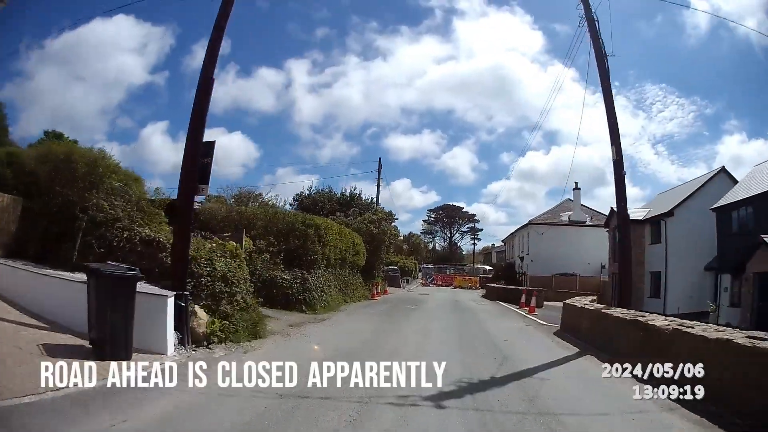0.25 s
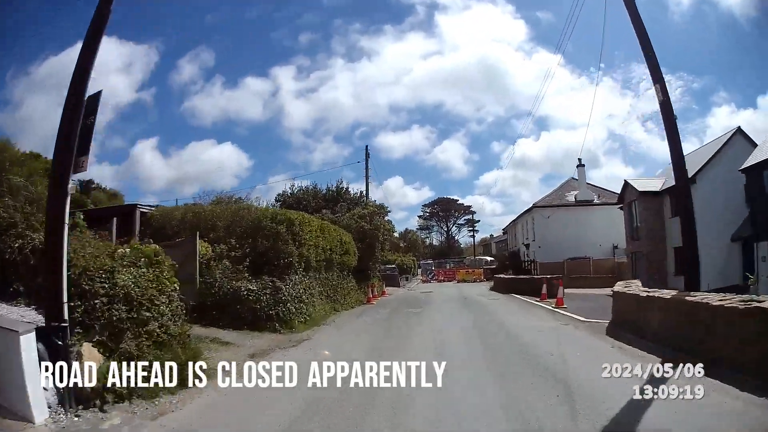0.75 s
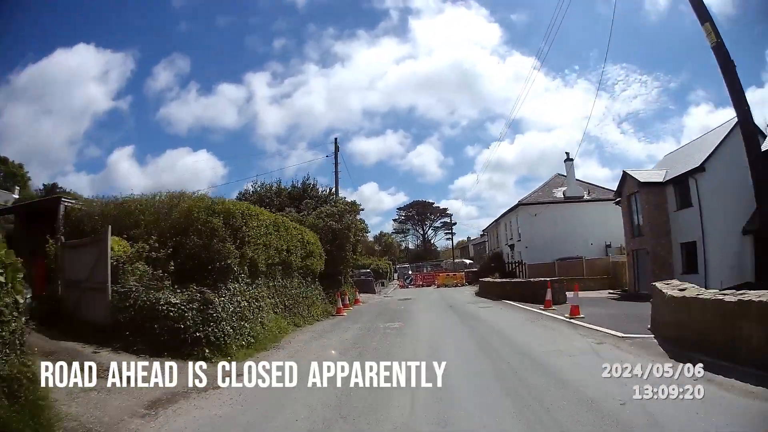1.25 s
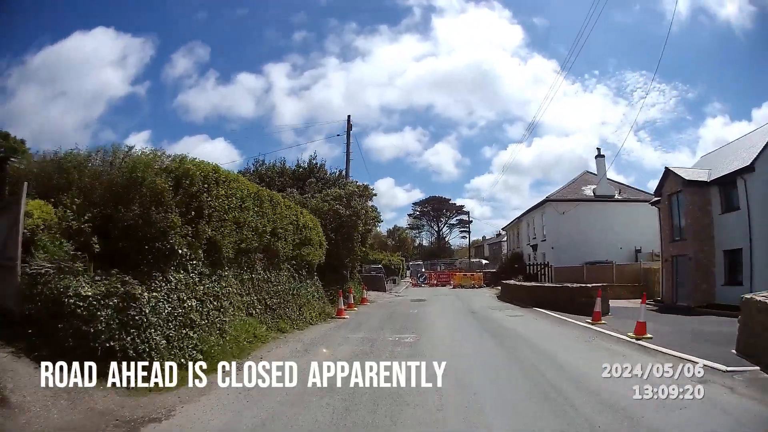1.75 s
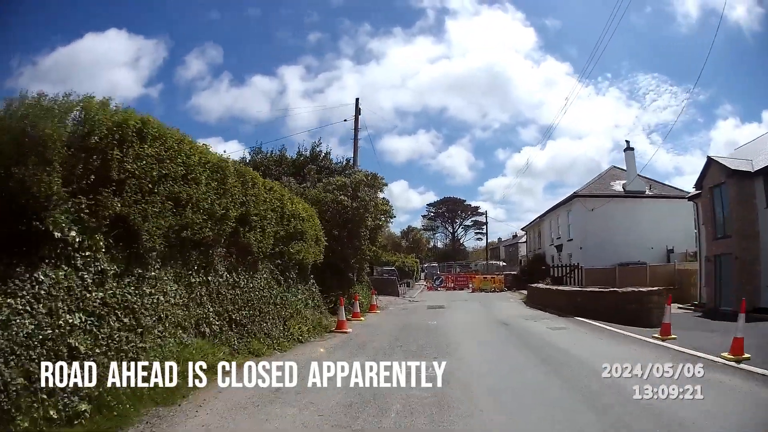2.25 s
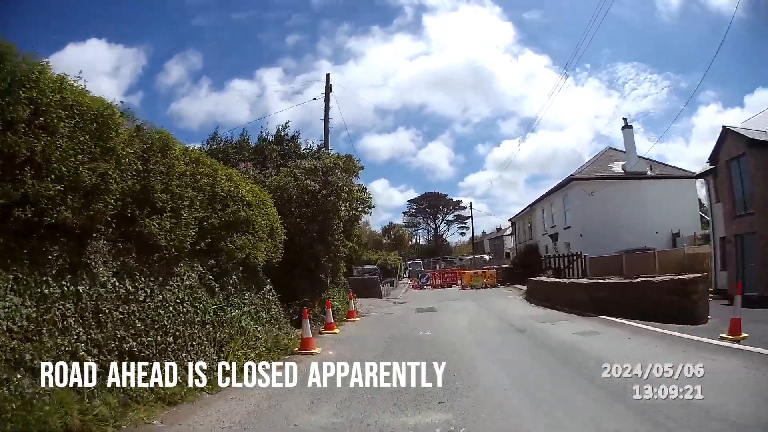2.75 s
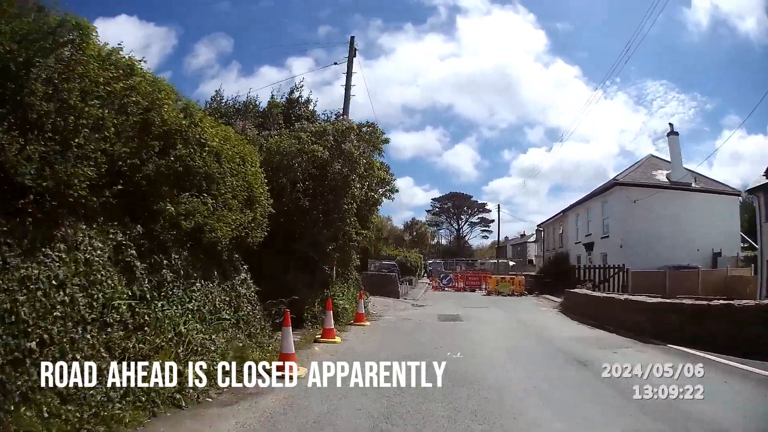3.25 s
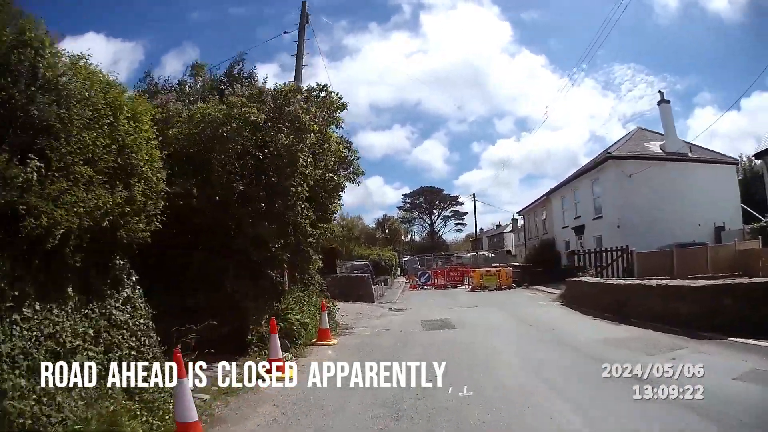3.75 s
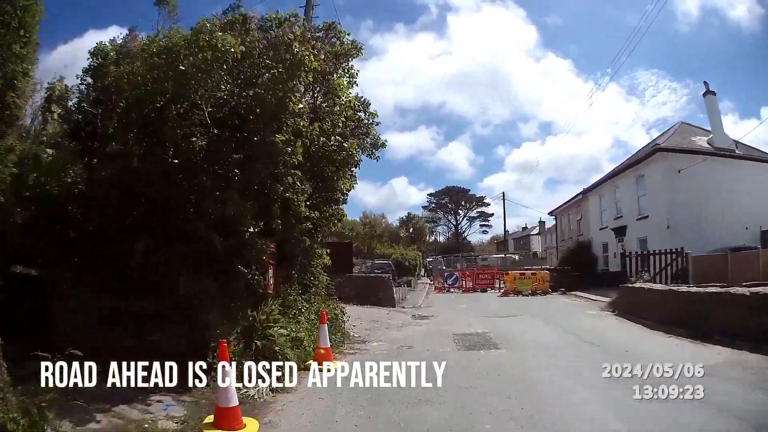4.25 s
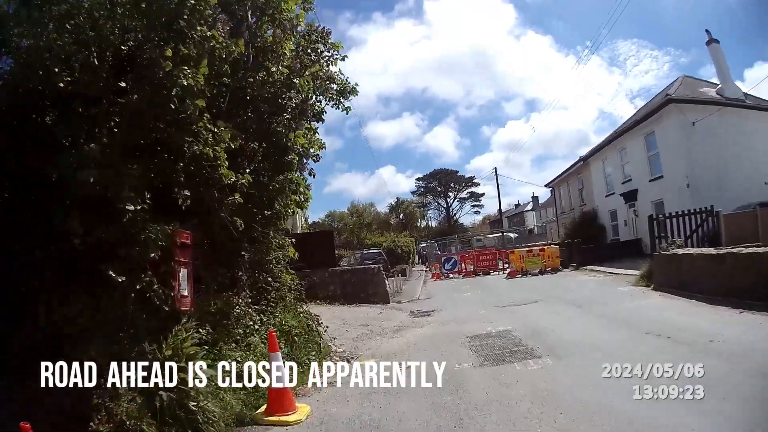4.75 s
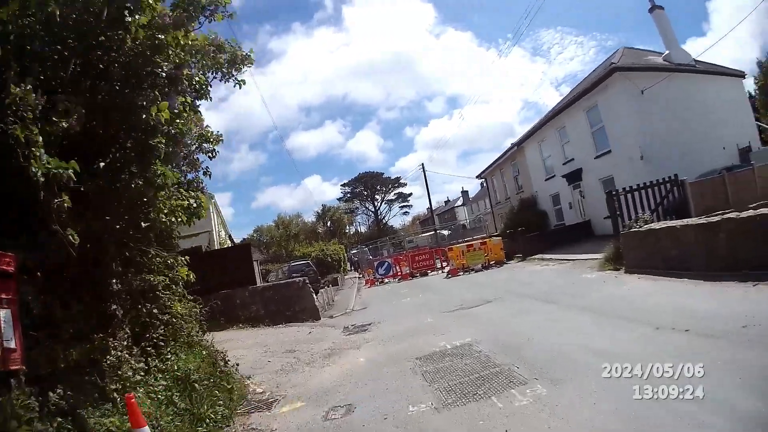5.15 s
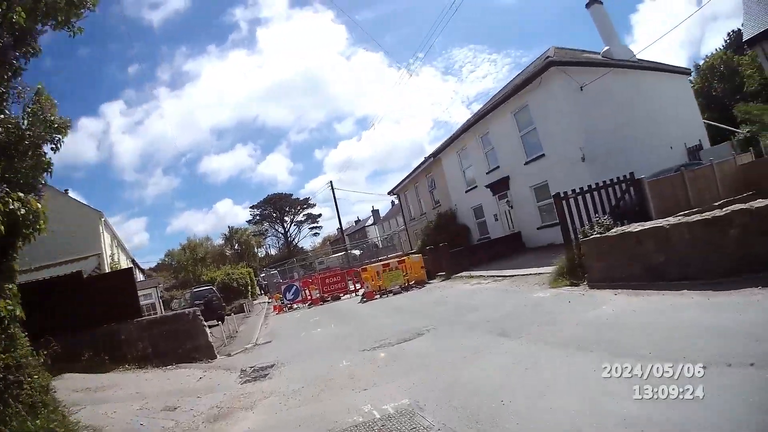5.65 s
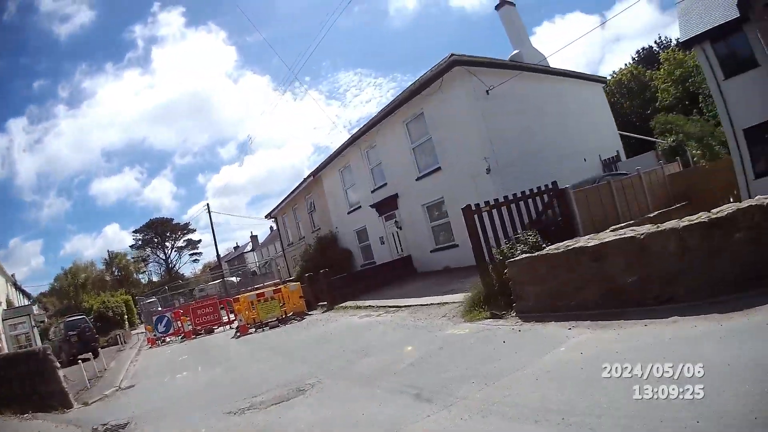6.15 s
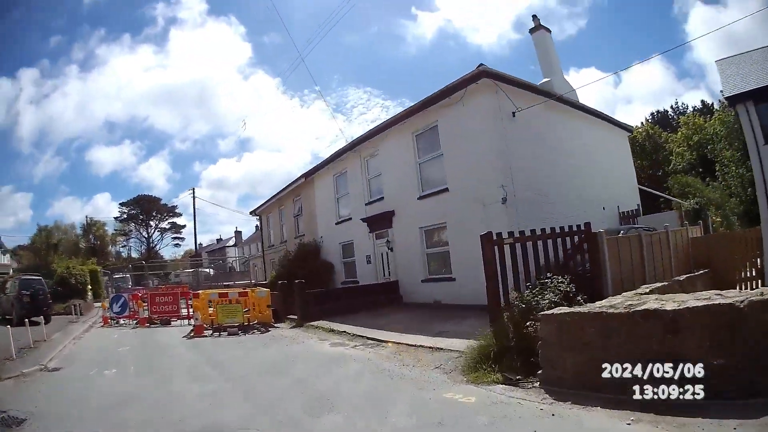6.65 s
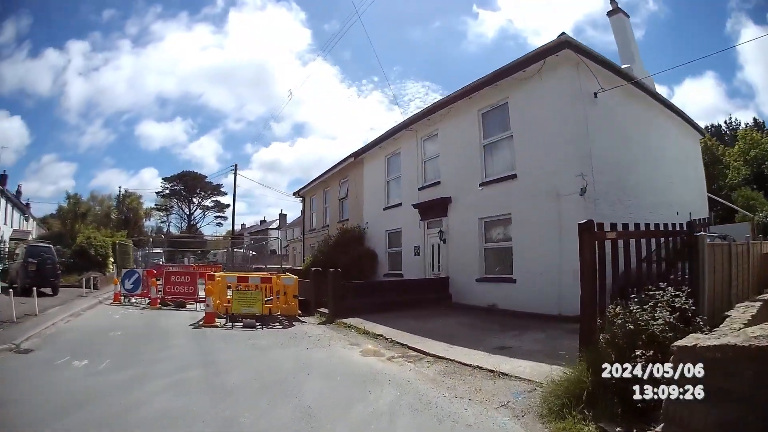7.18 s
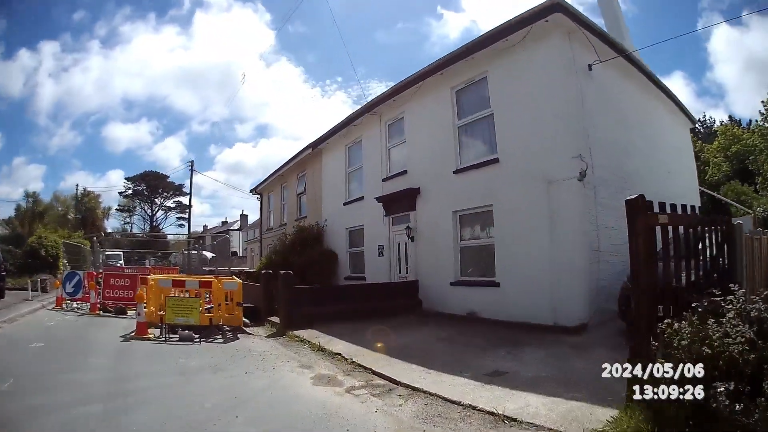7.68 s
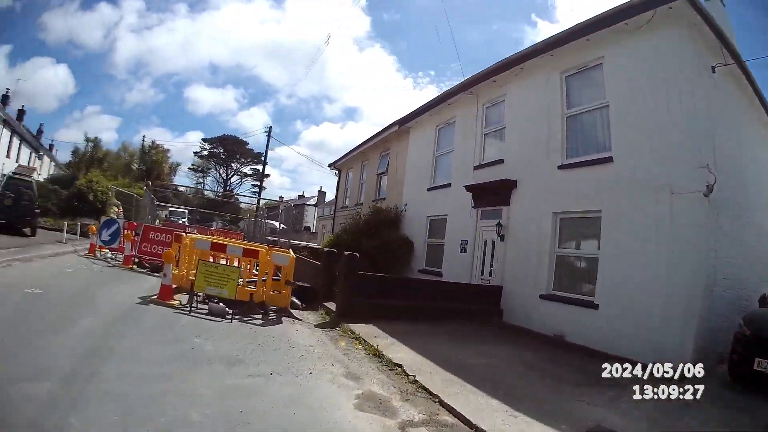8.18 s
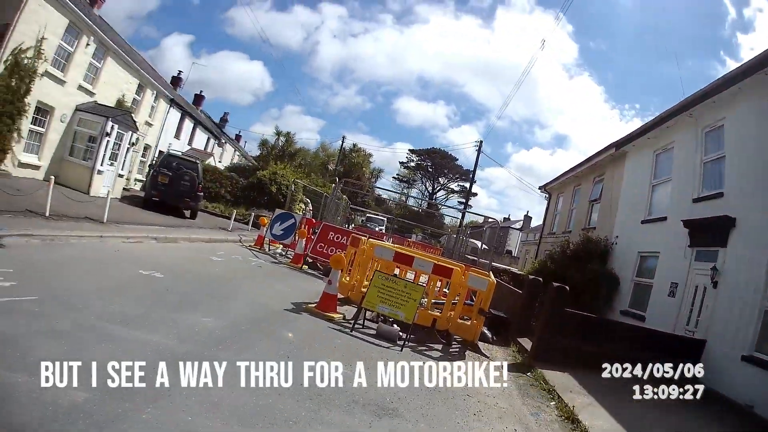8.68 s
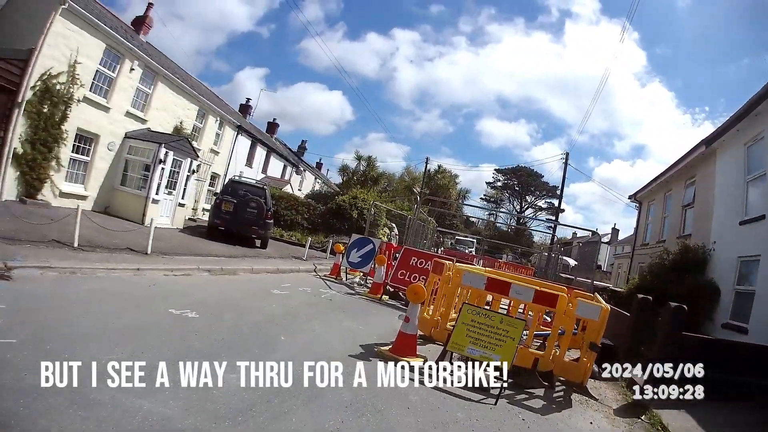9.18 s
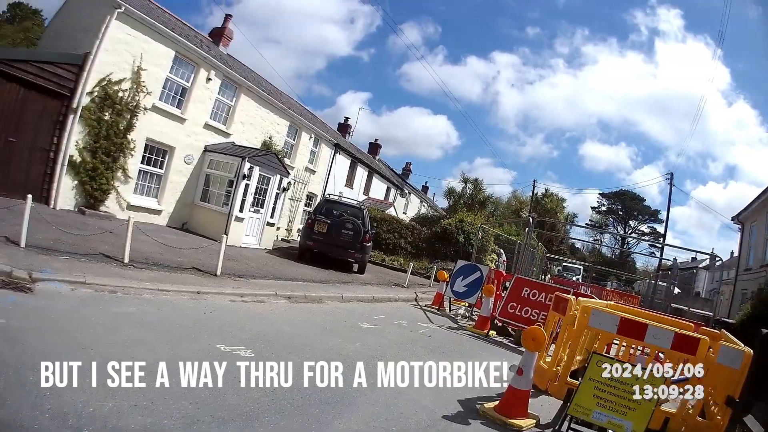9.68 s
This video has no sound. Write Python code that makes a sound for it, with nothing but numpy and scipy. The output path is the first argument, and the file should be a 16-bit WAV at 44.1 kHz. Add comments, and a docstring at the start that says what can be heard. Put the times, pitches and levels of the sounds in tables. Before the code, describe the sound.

A muffled motorcycle engine drones, eases off to idle and coasts slower, with ticking valves, road rumble and a few knocks.

```python
"""A four-cylinder motorcycle on the road, heard close up from a muffled microphone bolted to the bike.
The engine pulls, then drops to idle as the clutch comes in; the bike rolls on and slows, its tyre hum
sinking. The exhaust thumps and drones, while valve ticks and road rumble reach the microphone through
the resonances of frame, fairing and housing, with a few knocks and a squeak over a faint hiss."""
import sys
import numpy as np
from scipy import signal
from scipy.io import wavfile

SR = 44100
rng = np.random.default_rng(int(sys.argv[2]) if len(sys.argv) > 2 else 0)


def unload_wav(signal):
    """Save mono or channel-first audio to the path in sys.argv[1] as 16-bit WAV at rate SR, clipped to [-1, 1]."""
    wavfile.write(
        sys.argv[1],
        SR,
        np.round(np.clip(np.atleast_2d(signal).T, -1, 1) * 32767).astype(np.int16),
    )


N = 437472

# Resonances of the parts around the microphone. Each row: pitch in Hz, width in Hz, relative level in dB.
LOWER_HOUSING_MODES = [(647, 74, -14), (766.4, 81, -14.5)]
LENS_MOUNT_MODES = [(1990, 170, -40.5), (2488, 160, -42), (2710, 260, -54), (3130, 80, -42.5)]
RATTLE_MODES = [(7400, 500, 0), (8770, 700, 0), (9710, 400, -2)]


def exhaust_thumps(cycle, load):
    """Each cylinder gives a suction pulse with a slower rebound and rings the pipe."""
    # Each row: a cylinder's place in the cycle from 0 to 1, relative level in dB.
    cylinders = [(.062, 0), (.285, -7), (.49, -16), (.78, -17)]
    # The idle thumps firm up as the bike slows. Each row: time in seconds, extra level in dB.
    firmness = [(0, 0), (1.7, -2), (2.2, -7), (4, -6), (5, -1), (6.5, 0), (8.5, 0.5), (9.92, 0)]
    pulses = sum(from_db(db) * each_cycle(cycle, place, jitter_s=.00024, spread_db=1.6)
                 for place, db in cylinders)
    suction = bump(pulses, length_s=.0021)
    rebound = signal.sosfiltfilt(signal.butter(1, 120, fs=SR, output="sos"), suction)
    pipe = resonate(pulses, [(238, 35, 0)])
    level_db = by_load(load, idle=-36, pulling=-34.5) + in_time(firmness)
    return from_db(level_db) * (rms_one(rebound - suction) + .45 * rms_one(pipe))


def exhaust_drone(cycle, load):
    """Four firings a cycle make a tone; the other harmonics of the cycle swell under load."""
    # The firing tone. Each row: time in seconds, level in dB.
    firing_levels = [(0, -30), (.2, -30), (.42, -37), (.58, -26), (1.0, -26), (1.12, -41), (1.22, -27),
                     (1.4, -26), (1.6, -32), (1.85, -42), (5, -45), (9.92, -44)]
    # Each row: multiple of the cycle rate, relative level in dB. The fourth is left to the firing tone.
    partials = [(1, -42), (2, -28), (3, -10), (4, 0), (5, -7), (6, -11), (7, -6), (8, -5), (9, -9),
                (10, -8), (11, -9), (12, -12), (13, -11), (14, -24), (15, -26), (16, -28), (17, -22),
                (18, -19), (19, -17), (20, -17)]
    unsteady_cycle = cycle + .005 * drift(8)
    drone = 0
    for k, db in partials:
        if k != 4:
            drone += from_db(db + 2.2 * drift(2.2)) * np.sin(2 * np.pi * (k * unsteady_cycle + rng.random()))
    drone_db = by_load(load, idle=-62.5, pulling=-29.5)
    tone = -np.sqrt(2) * np.cos(2 * np.pi * 4 * (cycle - .015))
    tone_db = in_time(firing_levels) + 2.7 * drift(1.9)
    return from_db(tone_db) * tone + from_db(drone_db) * rms_one(drone)


def valve_clatter(cycle, load, patch_db):
    """Valves and pistons strike the bodywork; a gritty grind that swells with the blows fills the gaps."""
    # Each row: place in the cycle from 0 to 1, then strength in dB into fairing, lower housing,
    # upper housing, bracket and lens mount.
    contacts = [(.04, -16, -12, -9, -2, -8), (.065, -20, -20, -7, -12, -3), (.1, -20, 0, -14, -12, -7),
                (.25, -6.5, -7, -10, -17, -13), (.32, -20, -20, -5, -19, -14),
                (.43, -9, -20, -14, -20, -20), (.475, -1, -14, -14, -10, -14), (.52, -8, 0, -1.5, -9, -10),
                (.56, -14, -20, -14, -20, -6), (.6, -20, -12, -11, -20, -13),
                (.7, -8.5, -14, -14, -20, -16), (.9, -6, -14, -11, -16, -16), (.955, -20, -3, -9, -8, -11),
                (.998, -2, -9, -12, -16, -16)]
    # Body resonances. Each row: pitch in Hz, width in Hz, relative level in dB.
    fairing = [(339.3, 74, -7), (408.4, 79.1, 3), (454.8, 72.8, -0.5), (503.9, 56.4, -6.5)]
    upper_housing = [(1051, 163, -21.5), (1249, 87, -22.5), (1414, 174, -25)]
    bracket = [(1532, 100, -22.5), (1697, 99.5, -18.5)]
    # Harder strokes on the bracket. Each row: start in seconds, peak in dB.
    hard_strokes = [(2.9175, -46), (3.0784, -48), (3.7257, -45), (3.8865, -46), (4.1303, -47), (4.69, -47),
                    (5.191, -46), (5.358, -45), (5.8536, -42), (5.9344, -44), (6.015, -45), (6.2549, -46),
                    (6.4985, -46), (7.5473, -47), (7.872, -47), (8.1167, -48)]
    # Each row: resonances, weight of the blows, power that makes the grind grittier.
    bodies = [(fairing, .92, 1), (LOWER_HOUSING_MODES, .66, 1), (upper_housing, .5, 1),
              (bracket, .9, 1), (LENS_MOUNT_MODES, .74, 3)]
    blows = [each_cycle(cycle, row[0], jitter_s=.0003, spread_db=1.4) for row in contacts]
    # Single blows stand out at idle and blur at speed.
    distinct = np.clip(by_load(load, idle=.87, pulling=.4) + .07 * drift(.8), 0, 1.1)
    ringing = 0
    for column, (modes, weight, grit) in enumerate(bodies, 1):
        hits = sum(from_db(row[column]) * blow for row, blow in zip(contacts, blows))
        swell = 1 + .35 * distinct * rms_one(bump(hits, length_s=.008))
        grind = swell * rng.standard_normal(N) ** grit
        share = weight * distinct
        force = share * rms_one(hits) + np.sqrt(1 - share ** 2) * rms_one(grind)
        ringing += resonate(force, modes)
    level_db = by_load(load, idle=-42.5, pulling=-37.5) + patch_db
    return from_db(level_db) * rms_one(ringing) + sum(struck(bracket, s, db) for s, db in hard_strokes)


def tyres(patch_db):
    """The road rumbles in the frame and the tread hums; the rumble fades and the hum sinks with speed."""
    # Frame resonances. Each row: pitch in Hz, width in Hz, relative level in dB.
    frame = [(28, 8.6, -21), (62.5, 34, -9), (91.7, 28.7, -1.5), (118, 41, -13), (162.5, 30.4, 0),
             (211.8, 24.7, 1.5), (243.4, 34.7, -6.5)]
    # The slowing wheel. Each row: time in seconds, pitch of the hum in Hz.
    tread_pitch = [(0, 112.4), (1.4, 102.5), (3.6, 91.6), (4.3, 89.25), (5.2, 77), (6.3, 64.5), (7.3, 60.6),
                   (7.8, 55.8), (9.92, 47.2)]
    # How strongly the frame carries the hum. Each row: pitch in Hz, level in dB.
    hum_response = [(45, -44), (53, -54), (62, -37.5), (65, -57), (73, -55), (80, -32.5), (85, -37),
                    (91.5, -29), (97, -31), (102, -38), (110, -33), (114, -22)]
    # Brief dips of the hum. Each row: centre in seconds, half length in seconds, change in dB.
    hum_dips = [(1.13, 0.067, -8), (1.99, 0.033, -16), (2.15, .05, -4), (2.52, 0.025, -12),
                (2.64, 0.073, -14), (3.06, 0.072, -14.5), (3.82, 0.068, -4), (4.03, 0.057, -9.5),
                (4.25, 0.049, -14), (4.7, .1, -8), (5.06, 0.12, -12)]
    hz, db_per_octave = in_time(tread_pitch), 8.5
    roughness = rng.standard_normal(N) * from_db(1.1 * drift(8.1))
    rumble = rms_one(resonate(roughness, frame))
    rumble_db = -29.5 + db_per_octave * np.log2(hz / 90) + patch_db
    hum_db = np.interp(hz, *np.transpose(hum_response)) + 1.4 * drift(6) + swells(hum_dips)[0]
    phase = 2 * np.pi * np.cumsum(hz) / SR + .3 * drift(4)
    return from_db(rumble_db) * rumble + np.sqrt(2) * from_db(hum_db) * np.sin(phase)


def knocks():
    """Road jolts thud, gearbox and frame clunks crack and ring the housing, and a few sharp clicks
    sound, the loudest on the crests of the low thuds."""
    # Each row: start in seconds, peak in dB, ring in Hz.
    jolts = [(1.2165, -15, 215), (1.3097, -17, 165), (4.3137, -19, 195), (7.72, -36, 36)]
    # Each row: start in seconds, peak in dB, upper edge in Hz, lower housing and lens mount rings in dB.
    clunks = [(1.2556, -28, 1300, -36, -60), (1.2674, -33, 1800, -33, -54)]
    # Each row: time in seconds, peak in dB before the top is softened.
    sharp_clicks = [(.6327, -33), (1.3145, -32), (4.3231, -31.5), (6.3293, -45), (7.6975, -45)]
    t = np.arange(SR // 5) / SR
    clunk_decay_s, click_decay_s = .0015, .00016
    out = struck(RATTLE_MODES, s=4.8845, db=-61)   # one faint tink
    for s, db, hz in jolts:
        swell = t * hz * np.exp(1 - t * hz)
        out[round(s * SR):][:len(t)] -= from_db(db) * np.sin(2 * np.pi * hz * t) * swell
    for s, db, top_hz, housing_db, mount_db in clunks:
        dull = signal.butter(2, [400, top_hz], "band", fs=SR, output="sos")
        burst = (rng.standard_normal(len(t)) - 1) * np.exp(-t / clunk_decay_s)
        crack = signal.sosfilt(np.vstack([dull, dull]), burst)
        out[round(s * SR):][:len(t)] += from_db(db) * crack / np.abs(crack).max()
        out += struck(LOWER_HOUSING_MODES, s, housing_db) + struck(LENS_MOUNT_MODES[1:], s, mount_db)
    spike = np.exp(-np.abs(t - .01) / click_decay_s)
    click = signal.sosfilt(signal.butter(1, 9000, fs=SR, output="sos"), spike)
    for s, db in sharp_clicks:
        out[round((s - .01) * SR):][:len(t)] += from_db(db) * click
    return out


def squeak(start_s, length_s, hz, db):
    """A short, slightly wavering tone with soft ends."""
    t = np.arange(N) / SR
    fade = np.clip(np.minimum(t - start_s, start_s + length_s - t) / .012, 0, 1)
    level = np.sqrt(2) * from_db(db + 2.5 * drift(40)) * fade
    return level * np.sin(2 * np.pi * hz * t + 1.1 * drift(25))


def rattle(load, patch_db):
    """Thin noise in narrow high resonances, louder when the engine pulls."""
    level_db = by_load(load, idle=-100, pulling=-80.5) + patch_db
    return from_db(level_db) * rms_one(resonate(rng.standard_normal(N), RATTLE_MODES))


def resonate(x, modes):
    """Parallel resonances, each passed twice so that the valleys between them stay dark."""
    out = 0
    for k, (hz, width_hz, db) in enumerate(modes):
        r = np.exp(-1.5 * np.pi * width_hz / SR)
        b = (1 - r * r) / 2 * np.array([1, 0, -1])
        a = [1, -2 * r * np.cos(2 * np.pi * hz / SR), r * r]
        out += (-1) ** k * from_db(db) * signal.lfilter(b, a, signal.lfilter(b, a, x + 1e-18))
    return out


def struck(modes, s, db):
    """One sharp blow on a body at s seconds, ringing up to the given peak."""
    ring = resonate(signal.unit_impulse(SR // 10), modes)
    out = np.zeros(N)
    out[round(s * SR):][:len(ring)] = from_db(db) * ring / np.abs(ring).max()
    return out


def each_cycle(cycle, place, jitter_s, spread_db):
    """One click a cycle at the given place, with its own small timing error and strength."""
    turns = np.arange(int(cycle[-1]))
    timing, strength = rng.standard_normal((len(turns), 2)).T
    at = np.interp(turns + place, cycle, np.arange(N)) + jitter_s * SR * timing
    clicks = np.zeros(N)
    clicks[np.clip(at.astype(int), 0, N - 1)] = from_db(spread_db * strength)
    return clicks


def bump(clicks, length_s):
    """Spreads each click into a smooth hump centred on it."""
    return signal.fftconvolve(clicks, signal.windows.gaussian(SR // 20, length_s * SR / 2), "same")


def drift(hz):
    """Slow random wander of spread 1: noise at every 40th sample, low-passed twice at hz."""
    r = np.exp(-80 * np.pi * hz / SR)
    slow = signal.lfilter([1], [1, -2 * r, r * r], rng.standard_normal(N // 40 + 2002))[2000:]
    return np.interp(np.arange(N) / 40, np.arange(len(slow)), rms_one(slow))


def swells(rows):
    """Each row swells and fades smoothly around its centre; one curve for each dB column."""
    t = np.arange(N) / SR
    return sum(np.outer(dbs, np.cos(np.pi / 2 * np.clip((t - s) / half_s, -1, 1)) ** 2)
               for s, half_s, *dbs in rows)


def by_load(load, idle, pulling):
    return idle + (pulling - idle) * load


def in_time(rows):
    return np.interp(np.arange(N) / SR, *np.transpose(rows))


def from_db(db):
    return 10 ** (np.asarray(db) / 20)


def rms_one(x):
    return x / np.sqrt(np.mean(x ** 2) + 1e-20)


def scene():
    """Engine, tyres and small knocks and rattles, all close to the microphone."""
    # Each row: time in seconds, four-stroke cycles per second.
    engine_speed = [(0.0, 23.526), (0.504, 21.614), (1.38, 21.525), (1.667, 16.544), (1.838, 14.249),
                    (2.1, 12.608), (2.401, 12.295), (2.702, 12.443), (3.002, 12.069), (3.303, 12.423),
                    (3.604, 12.626), (3.905, 12.41), (4.205, 12.436), (4.506, 12.333), (4.807, 12.027),
                    (5.108, 12.126), (5.408, 12.088), (5.709, 12.128), (6.01, 12.44), (6.311, 12.493),
                    (6.612, 12.402), (6.912, 12.425), (7.213, 12.316), (7.514, 12.28), (7.815, 12.363),
                    (8.115, 12.105), (8.416, 12.117), (8.717, 12.487), (9.018, 12.591), (9.318, 12.339),
                    (9.619, 12.144), (9.92, 11.977)]
    # Rougher or smoother patches of road. Each row: centre and half length in seconds, then extra
    # rumble, clatter and rattle in dB.
    road_patches = [(.05, 0.29, 2, 2.5, -2), (0.652, 0.63, -4.5, 0.2, 0), (1.209, 0.089, 5, 1.5, 1),
                    (4.3, 0.48, 1, 0.5, -3.5), (7.0, 0.47, 1, -0.5, 0), (7.778, 0.18, 4, 1.5, 19)]
    speed = in_time(engine_speed)
    cycle = np.cumsum(speed) / SR + .008 * drift(3)   # each cycle runs a little early or late
    idle_per_s, pull_per_s = 12.7, 21.5
    load = np.clip((speed - idle_per_s) / (pull_per_s - idle_per_s), 0, 1)
    rumble_db, clatter_db, rattle_db = swells(road_patches)
    small = rattle(load, rattle_db) + squeak(start_s=.645, length_s=.075, hz=1105, db=-53) + knocks()
    exhaust = exhaust_drone(cycle, load) + exhaust_thumps(cycle, load)
    return (exhaust + valve_clatter(cycle, load, clatter_db) + tyres(rumble_db) + small)[None]


def record(dry):
    """The microphone adds a faint hiss that thins at the top and a steady offset; the treble is cut."""
    hiss_db, cutoff_hz, offset = -74.5, 15000, -.0157
    hiss = signal.lfilter([1, .15], [1], rng.standard_normal(dry.shape)) * from_db(hiss_db)
    hiss = signal.sosfilt(signal.butter(3, 14500, fs=SR, output="sos"), hiss)
    return signal.sosfilt(signal.ellip(10, .5, 60, cutoff_hz, fs=SR, output="sos"), dry + hiss) + offset


dry = scene()
out = record(dry)
unload_wav(out)
```